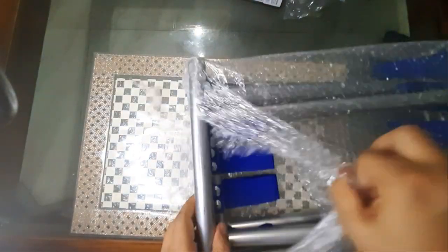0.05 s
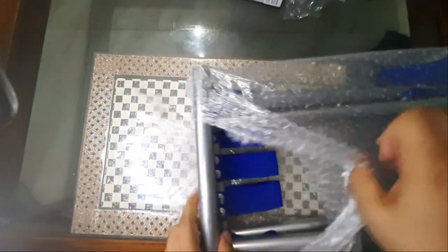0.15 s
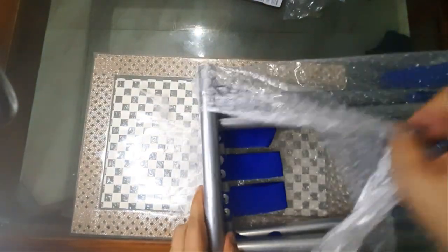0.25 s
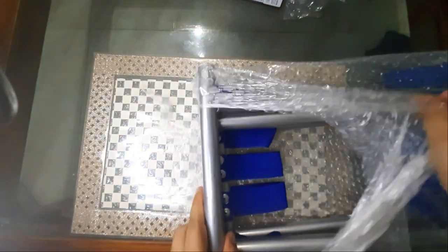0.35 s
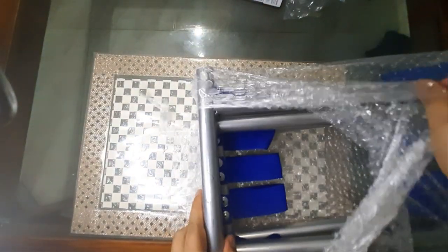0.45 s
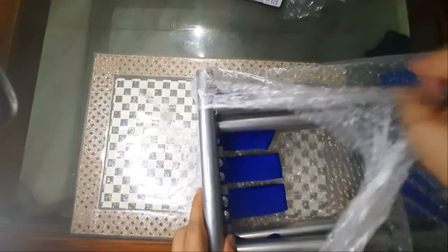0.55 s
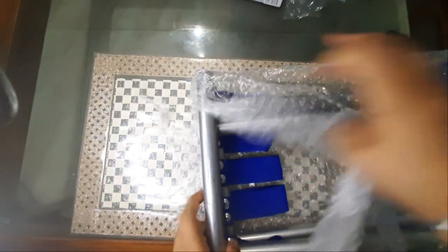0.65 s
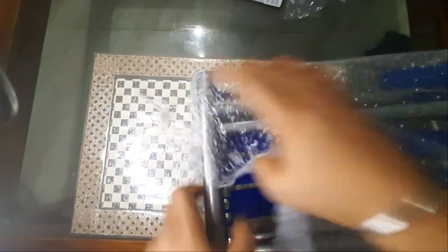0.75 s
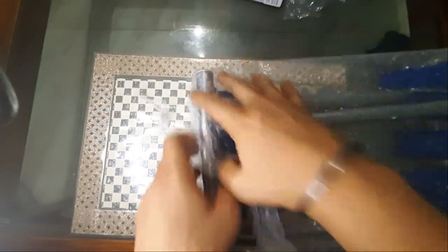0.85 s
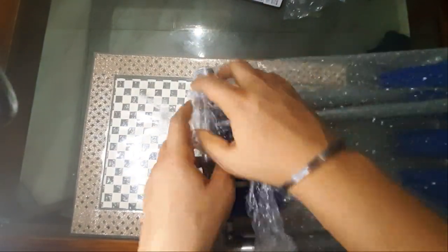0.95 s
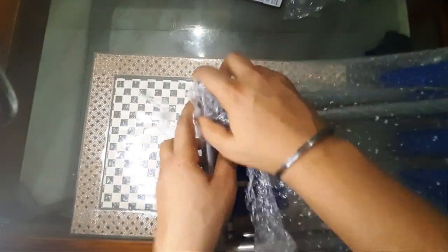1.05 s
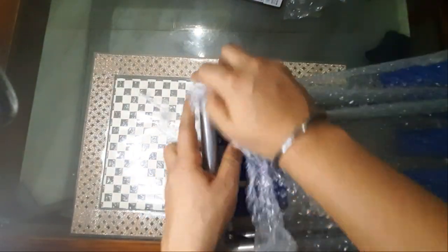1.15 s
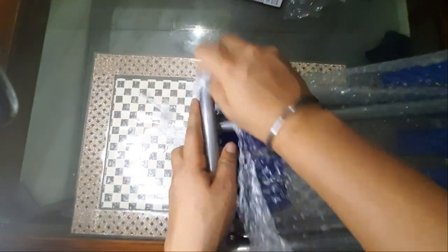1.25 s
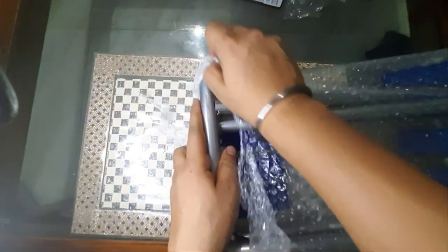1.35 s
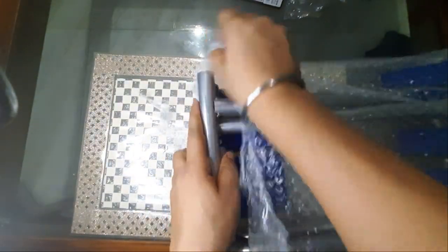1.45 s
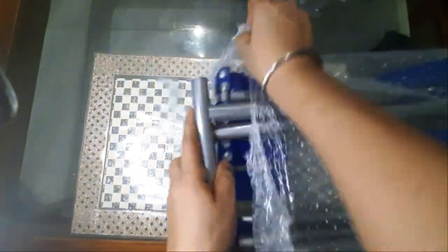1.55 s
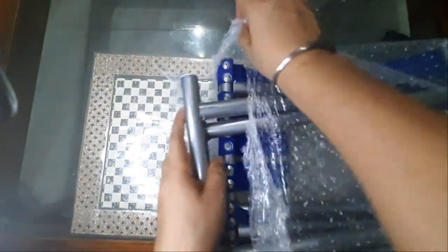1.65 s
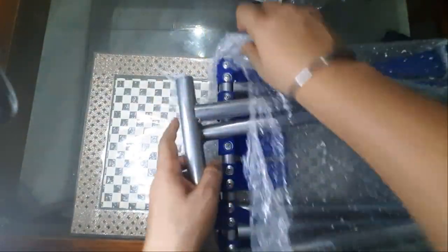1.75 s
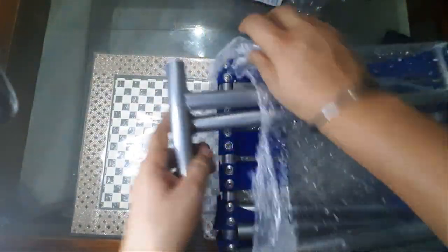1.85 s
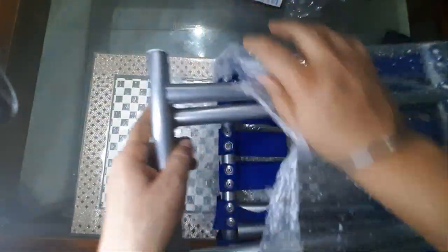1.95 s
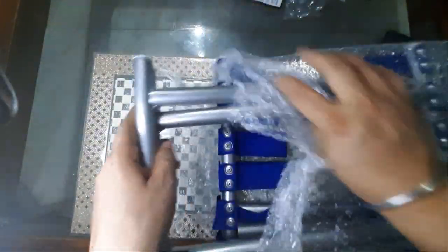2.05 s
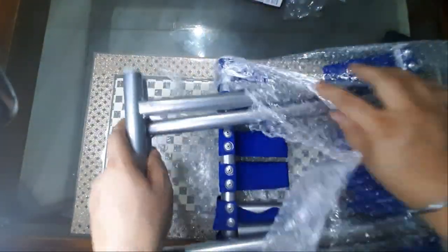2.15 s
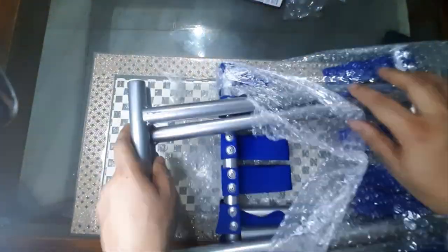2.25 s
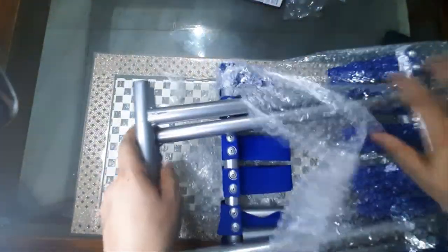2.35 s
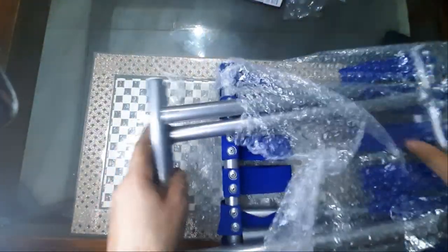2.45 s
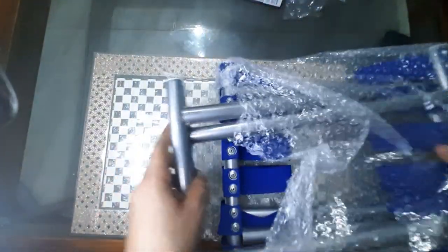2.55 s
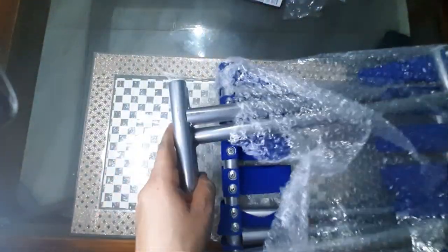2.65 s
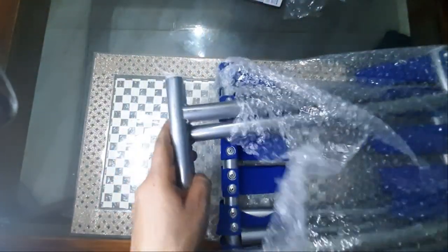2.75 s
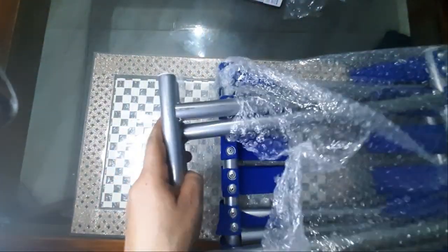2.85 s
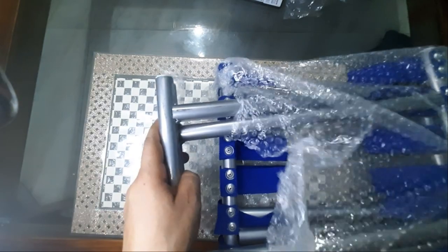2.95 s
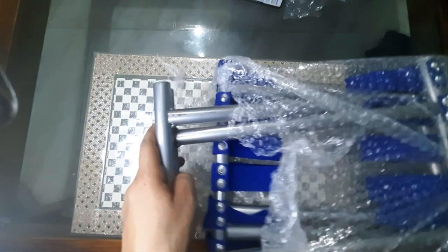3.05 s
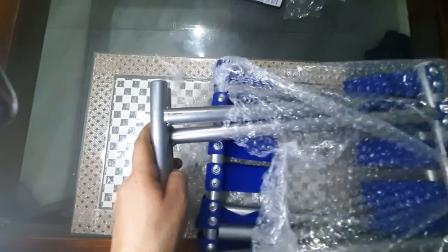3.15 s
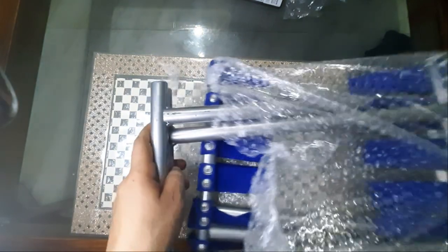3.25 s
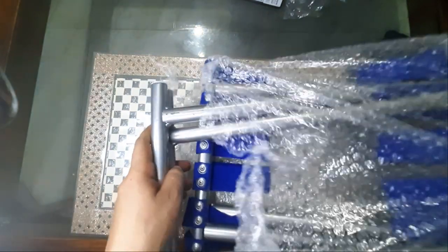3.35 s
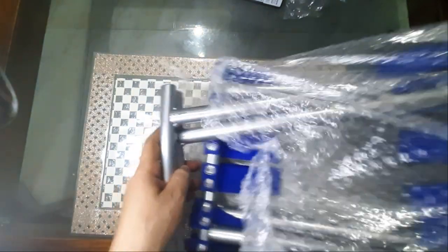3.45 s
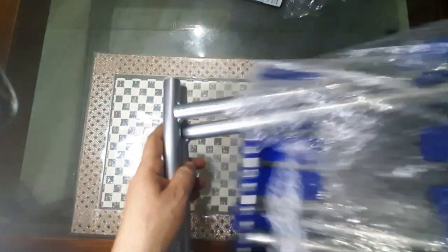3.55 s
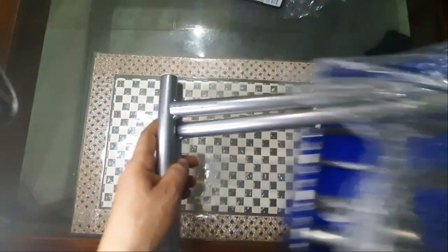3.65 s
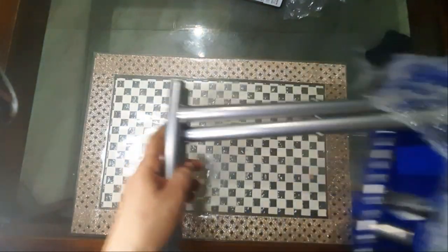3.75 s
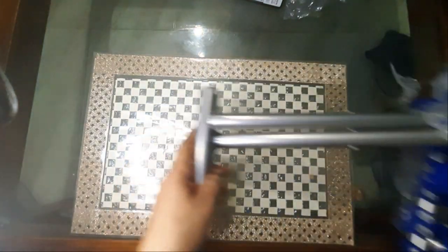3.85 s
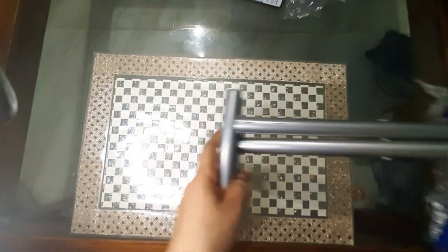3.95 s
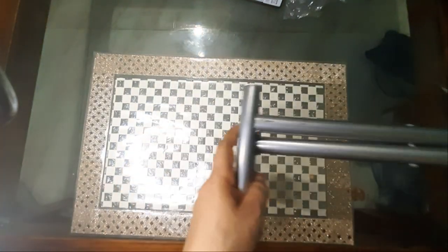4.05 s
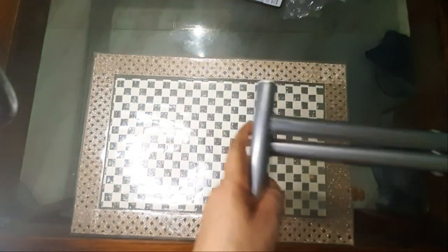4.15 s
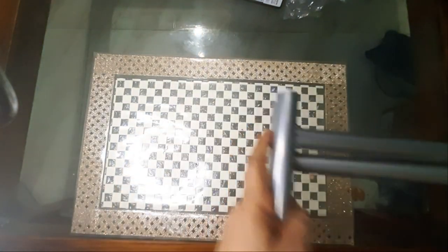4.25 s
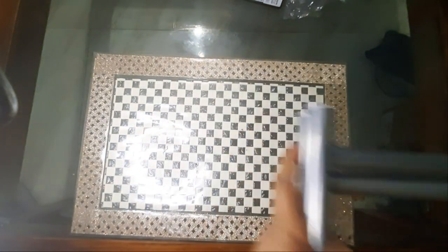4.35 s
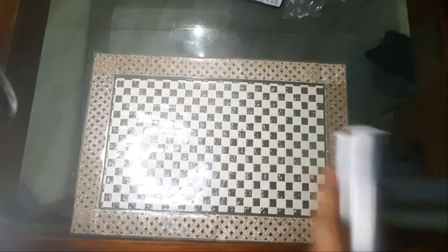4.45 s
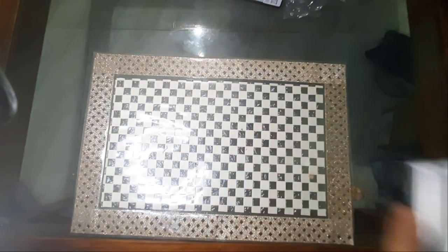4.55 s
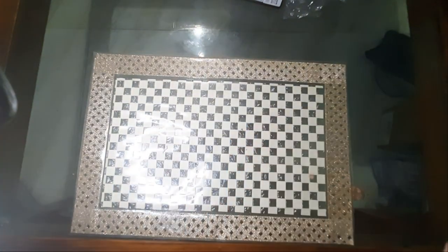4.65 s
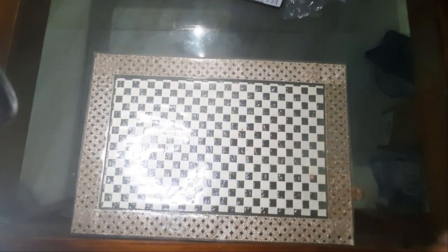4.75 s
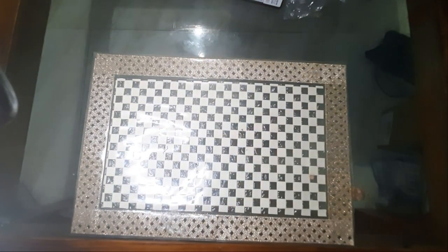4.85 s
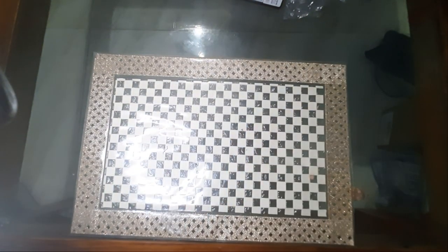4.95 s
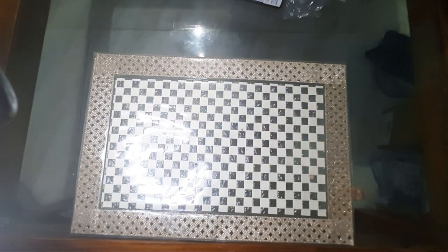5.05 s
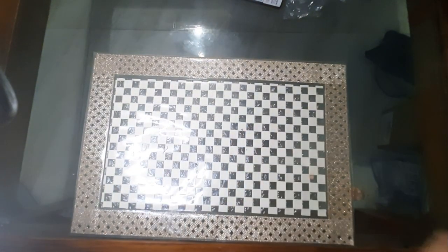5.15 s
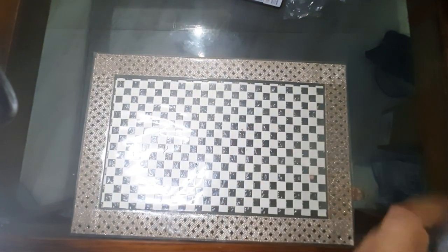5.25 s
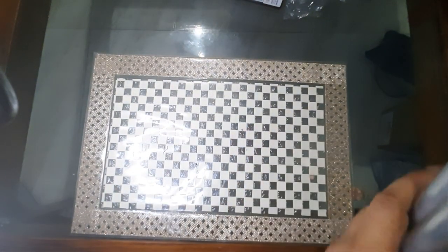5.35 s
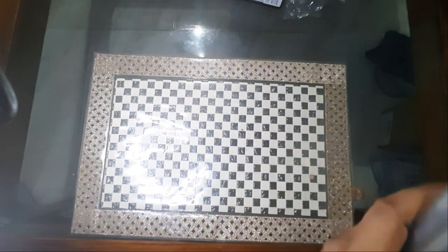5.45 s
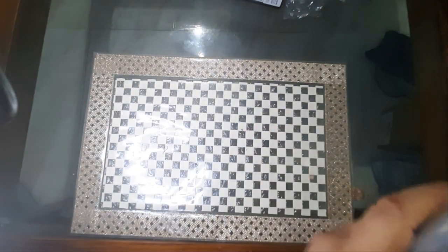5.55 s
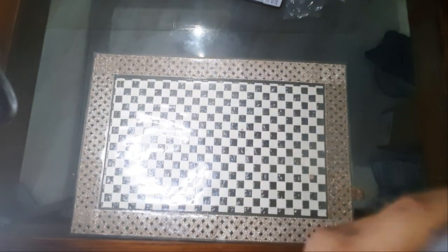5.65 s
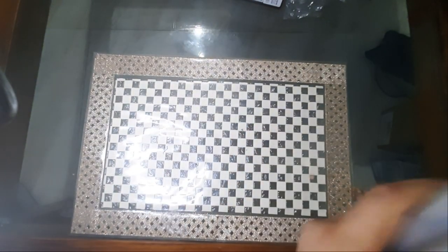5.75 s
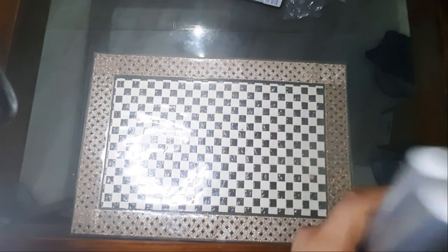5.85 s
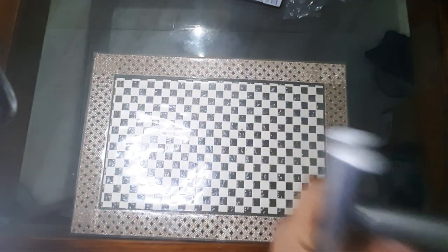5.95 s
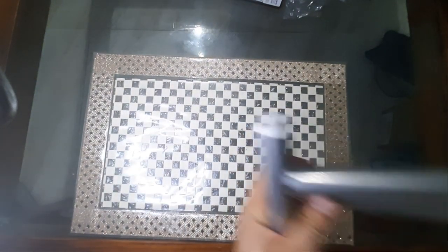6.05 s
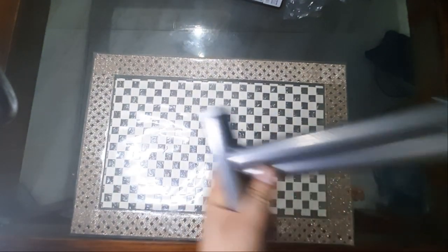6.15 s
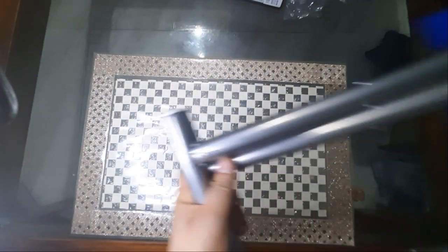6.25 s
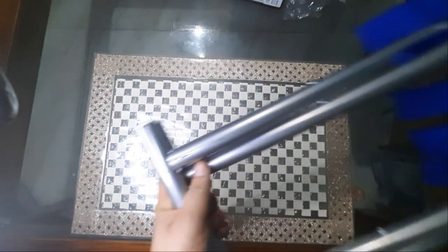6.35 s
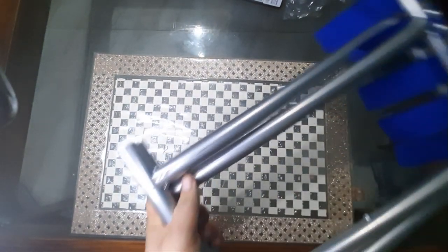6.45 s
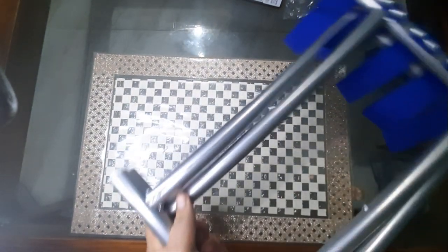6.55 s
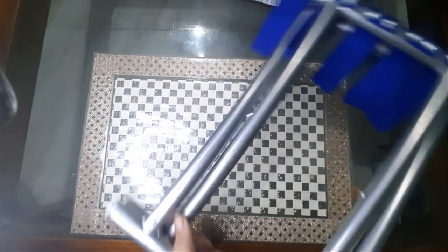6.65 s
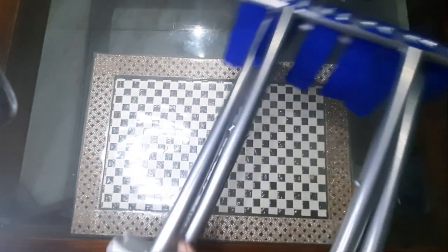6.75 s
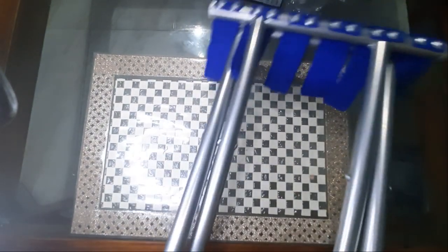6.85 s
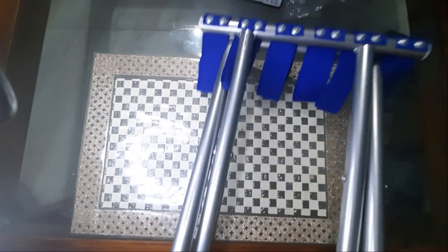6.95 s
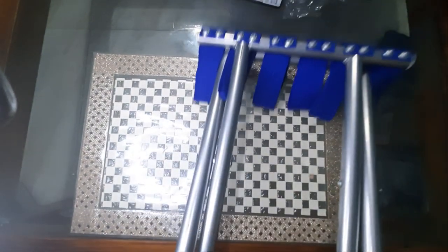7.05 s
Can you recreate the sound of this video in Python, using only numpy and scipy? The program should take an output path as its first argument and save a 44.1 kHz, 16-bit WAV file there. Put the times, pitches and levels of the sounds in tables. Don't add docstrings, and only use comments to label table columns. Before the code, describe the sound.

Close plastic film rustling with sharp pops, hollow metal tube knocks and low table rumble, thinning to sparse crackles and a faint whistle.

```python
import sys
import numpy as np
from scipy import signal
from scipy.fft import rfft, irfft, next_fast_len
from scipy.io import wavfile
from scipy.ndimage import uniform_filter1d

SR = 44100
rng = np.random.default_rng(int(sys.argv[2]) if len(sys.argv) > 2 else 0)


def ratio(d):
    e = np.asarray(d, float) / 20
    return 10 ** e


def digitize_waveform(pressure):
    field = np.atleast_2d(pressure).T
    bounded = np.clip(field, -1, 1)
    quanta = np.round(bounded * 32767).astype(np.int16)
    wavfile.write(sys.argv[1], SR, quanta)


N = 312669


def rms_one(x):
    return x / np.sqrt(np.mean(x ** 2) + 1e-20)


def in_time(rows):
    s, *columns = np.transpose(rows)
    return [np.interp(np.arange(N) / SR, s, column) for column in columns]


def at_hz(points, hz):
    points_hz, points_db = np.transpose(points)
    return np.interp(np.log(hz), np.log(points_hz), points_db)


def drift(rate):
    r = np.exp(-80 * np.pi * rate / SR)
    noise = rng.standard_normal(N // 40 + 2002)
    slow = signal.lfilter([1], [1, -2 * r, r * r], noise)[2000:]
    return np.interp(np.arange(N) / 40, np.arange(len(slow)), rms_one(slow - slow.mean()))


def ring(clicks, hz, t60):
    r = ratio(-60 / (t60 * SR))
    w = 2 * np.pi * hz / SR
    return signal.lfilter([0, np.sin(w)], [1, -2 * r * np.cos(w), r * r], clicks + 1e-18)


def band(x, low_hz, high_hz):
    edges = [low_hz, min(high_hz, .45 * SR)]
    return signal.sosfilt(signal.butter(2, edges, "band", fs=SR, output="sos"), x)


def steep_low(x, hz):
    return signal.sosfilt(signal.ellip(8, .5, 50, .98 * hz, fs=SR, output="sos"), x)


def grains(per_s, uneven_db, clump_db, clump_rate):
    sizes = ratio(uneven_db * np.minimum(rng.exponential(1, N), 5)) * rng.choice([-1, 1], N)
    happens = rng.random(N) < per_s / SR
    return rms_one(sizes * happens * ratio(clump_db * drift(clump_rate)))


def swarm(clicks, spectrum, cycles, patchy_db, count):
    low_hz, high_hz = spectrum[0][0], spectrum[-1][0]
    dealt = rng.integers(0, count, N)
    out = np.zeros(N)
    for k, hz in enumerate(np.geomspace(low_hz, high_hz, count)):
        gain = ratio(at_hz(spectrum, hz) + patchy_db * drift(6.7))
        out += gain * ring(clicks * (dealt == k), hz, cycles / hz)
    return rms_one(band(out, low_hz, high_hz))


def gestures(rows, swing=1.0):
    coarse = np.arange(0, N + 64, 64)
    t, power = coarse / SR, 0
    for s, db, swell, ease in rows:
        before, after = (s - t) / np.clip(swell, .004, 2), (t - s) / np.clip(ease, .004, 2)
        away = np.where(t < s, before, after)
        power = power + ratio(2 * (db - 20 * swing * away))
    return np.interp(np.arange(N), coarse, power)


def chatter(at, strength, length):
    out, t = np.zeros(N + 4000), np.arange(4000) / SR
    for i, gain, t60 in zip(at, strength, np.clip(length, .005, .3)):
        rattle = rng.standard_normal(len(t)) * np.exp(-np.log(1000) * t / t60)
        rattle *= 1.07 / np.sqrt(np.sum(rattle ** 2))
        rattle[0] = 1.2
        out[i:i + len(t)] += gain * rattle
    return out[:N]


# (frequency [Hz], density [dB per Hz])
AIR_SPECTRUM = [(30, -2), (59, 10.5), (1590, -10), (1850, -12), (2900, -24.5), (3980, -9), (8000, -15.5),
                (16000, -52)]
AIR_DB = -60


def air():
    hz = np.maximum(np.fft.rfftfreq(N, 1 / SR), 1)
    shaped = rfft(rng.standard_normal(N)) * ratio(at_hz(AIR_SPECTRUM, hz))
    return ratio(AIR_DB) * rms_one(irfft(shaped, N))


# (time [s], cancelled pitch [Hz])
GLASS_ECHO = [(0, 2730), (.4, 2520), (.6, 2350), (1.05, 1900), (1.9, 1720), (2.3, 2340), (2.45, 2440),
              (3.1, 2700), (3.45, 2360), (4.1, 2450), (4.3, 2750), (4.6, 2870), (5.9, 2500), (6.1, 2700),
              (6.52, 2180), (6.75, 2670), (7.09, 2700)]


def off_glass(x, share):
    samples = np.arange(N)
    lag = SR / (2 * in_time(GLASS_ECHO)[0])
    late = np.interp(samples - lag, samples, uniform_filter1d(x, size=9))
    return x + share * late


SLIPS_PER_S, SLIP_S, SLIP_DEPTH = 100, 0.011, 0.14


def slips(far):
    fits = (rng.random(N) < SLIPS_PER_S / SR) * rng.exponential(SLIP_DEPTH, N) * (1 - far)
    return rms_one(1 + signal.lfilter([1], [1, -np.exp(-1 / (SLIP_S * SR))], fits))


# (frequency [Hz], level [dB])
RUSTLE = [(1900, -16.5), (2500, -11), (3200, -11), (4500, -6), (6300, -2), (8000, -5), (10000, 3),
          (12200, -21)]
CREASE = [(800, -20.5), (1200, -3), (1700, 6), (2400, 7.5), (3200, 10.5)]
FINEST = [(10000, 9.5), (11500, 0.5), (13000, 4.5), (16800, 3.5)]
# (time [s], level [dB])
TOUCH = [(0, -44), (.43, -38), (.5, -57), (.6, -45.5), (1.05, -56.5), (1.13, -43.5), (1.74, -53),
         (2.8, -94), (3.43, -72), (3.96, -56.5), (4.6, -53.5), (5.08, -50), (5.13, -75), (5.68, -46),
         (5.77, -79), (6.1, -75.5), (6.13, -47), (7.09, -54.5)]
# (time [s], distance [m])
DISTANCE = [
    (0, 0.44),
    (1.4, 0.52),
    (2.2, 0.76),
    (4.45, 0.67),
    (4.9, 0.48),
    (5.7, 0.57),
    (6.15, 1.85),
    (6.3, 0.84),
    (6.75, 1.11),
    (7.09, 0.78),
]
# (peak time [s], level [dB], swell [s], ease [s], share of large creases [dB])
PULLS = [(0.02, -34.5, 0.21, 0.2, -3), (0.24, -41, 0.45, 0.49, 0.5), (0.72, -42.5, 0.076, 0.27, -8),
         (0.87, -45.5, 0.33, 0.31, -1), (1.52, -30, 0.14, 0.16, 6), (1.6, -43, 0.089, 0.25, 9.5),
         (1.92, -41.5, 0.46, 0.4, -14), (2.08, -37.5, 0.33, 0.16, -11), (2.335, -40, 0.045, 0.074, -6.5),
         (2.46, -48.5, 0.22, 0.045, -23), (2.63, -44, 0.46, 0.49, -8), (2.9, -42, 0.15, 0.13, -7.5),
         (3.03, -38, 0.16, 0.2, -3.5), (3.28, -43, 0.14, 0.064, -14), (3.6, -31, 0.28, 0.44, -5.5),
         (3.75, -33, 1, 0.14, 3), (3.82, -34.5, 0.086, 0.094, 5.5), (4.25, -41, 0.12, 0.25, -2.5),
         (5.0, -52.5, 0.66, 0.48, 3.5), (5.46, -43.5, 0.22, 0.3, -1.5), (5.6, -42, 0.14, 0.13, 1),
         (6.3, -46, 0.15, 0.53, 6.5), (6.87, -60, 0.067, 1, 4), (7.09, -39, 0.51, .1, 3)]
# (time [s], level [dB], ease [s], share of large creases [dB])
JERKS = [(0.407, -41, 0.067, 7), (1.238, -35, 0.12, -7), (1.338, -49.5, 0.081, 13.5),
         (1.443, -32, 0.08, -0.5), (2.19, -38.5, 0.18, 7), (4.416, -43.5, 0.22, 1), (4.641, -34, 0.28, 1),
         (4.7, -52, 0.51, 12.5), (4.84, -44, 0.15, 4), (5.159, -46.5, 1, -4), (6.121, -38.5, 0.27, -0.5),
         (3.2, -48, 0.25, 0), (3.669, -29, 0.18, -2), (5.484, -40.5, 0.13, 4.5), (5.648, -42.5, 0.1, 8.5),
         (6.209, -43, 0.13, 7.5), (6.231, -40.5, 0.29, 6.5)]
JERK_S = .005
FINEST_DB, FINEST_LOSS_DB_PER_M, FINEST_SWING = -10, 23, 1.46
LARGE_SWING, TOUCH_LARGE_DB = 1.84, -25.5
FAR_M, FAR_TOP_HZ, RUSTLE_TOP_HZ = 1.18, 8150, 11900


def film():
    moves = PULLS + [(s, db, JERK_S, ease, share) for s, db, ease, share in JERKS]
    heavy = [(s, db + share, swell, ease) for s, db, swell, ease, share in moves]
    touch = ratio(2 * in_time(TOUCH)[0])
    metres = in_time(DISTANCE)[0]
    far = np.clip(metres / FAR_M, 0, 1) ** 2

    rustle_gain = np.sqrt(touch + gestures([move[:4] for move in moves]))
    large_gain = np.sqrt(touch * ratio(2 * TOUCH_LARGE_DB) + gestures(heavy, LARGE_SWING))
    nearness = ratio(-47 + FINEST_DB - FINEST_LOSS_DB_PER_M * metres)
    finest_gain = (rustle_gain / ratio(-43)) ** FINEST_SWING * nearness

    rustle = swarm(grains(9000, 2.2, 1.8, 25), RUSTLE, cycles=14.0, patchy_db=2.4, count=14)
    rustle = steep_low(rms_one(off_glass(rustle, share=1.45)), RUSTLE_TOP_HZ)
    dull = signal.sosfiltfilt(signal.butter(4, FAR_TOP_HZ, fs=SR, output="sos"), rustle)
    rustle = (1 - far) * rustle + far * dull
    large = swarm(grains(3000, 0.52, 0.34, 21), CREASE, cycles=16.8, patchy_db=4.0, count=8)
    large = rms_one(off_glass(large, share=0.68))
    finest = swarm(grains(16000, 1.6, 1.5, 45), FINEST, cycles=46.0, patchy_db=3.5, count=5)

    creases = ratio(-0.5) * rustle_gain * rustle
    creases += ratio(-1.5) * large_gain * large
    creases += ratio(10.5) * finest_gain * finest
    return slips(far) * creases


# (frequency [Hz], level [dB], t60 [s])
TUBES = [(411.5, -15, 0.44), (464, -9, 0.2), (557.5, 0.5, 0.13), (714, -1.5, 0.1), (766, -7.5, 0.085),
         (836, -15.5, 0.23), (1080, -14, 0.23), (1187, -11, 0.058), (1237, -11.5, 0.11), (1274, -14, 0.087),
         (1447, -14, 0.11), (1900, -31, 0.012), (2082, -15, 0.063), (2420, -15, 0.066), (2700, -28, 0.057)]
GLASS_TOP = [(68.5, -16.5, 0.26), (109, -7, 0.45), (141, -10, 0.2), (177.2, -2, 0.33), (287, -13.5, 0.22),
             (359.5, -16, 0.18)]
# (frequency [Hz], level [dB])
RUBBING = [(200, -38), (330, -2.5), (520, 8.5), (750, -2), (1200, 10)]
RUMBLE = [(40, -82), (62, 6.5), (110, 2.5), (180, -7.5), (280, 9.5)]
# (peak time [s], level [dB], swell [s], ease [s], weight
# on the glass [dB])
SHOVES = [(0.03, -34.5, 0.29, 0.16, -2), (0.22, -36.5, 0.13, 0.054, -16), (0.3, -40, 0.11, 0.22, -0.5),
          (0.72, -46.5, 0.067, 0.61, -11.5), (0.88, -39, 0.27, 0.066, -3.5), (1.1, -51.5, 0.26, 0.87, 3.5),
          (1.26, -41, 0.2, 0.33, -20), (1.55, -30, 0.12, 0.21, 6.5), (1.9, -42.5, 0.18, 0.27, -19),
          (2.099, -42, 0.32, 0.16, -10.5), (2.26, -41, 0.12, 0.34, -2), (2.48, -52, 0.38, 0.56, -14),
          (2.65, -42, 0.37, 0.19, -1), (3.07, -36, 0.21, 0.14, 0.5), (3.26, -44.5, 0.15, 0.65, 5.5),
          (3.54, -32.5, 0.13, 0.38, -18), (3.68, -38.5, 0.31, 0.22, 4), (3.799, -37, 0.57, 0.019, -10),
          (4.26, -50.5, 0.1, 0.22, 7), (4.67, -44, 0.063, 0.27, 3), (4.92, -50, 0.29, 0.32, -7.5),
          (5.5, -53, 0.11, 0.067, 17), (5.65, -48, 0.093, 0.13, 7), (6.22, -45.5, 0.013, 0.24, -4),
          (5.2, -58.5, 0.094, 0.34, 12),
    (6.27, -43, 0.047, 0.14, 21.5),
    (6.33, -40, 0.12, 0.13, -7),
    (6.623, -60, 0.13, 0.22, 23.5),
    (6.69, -49, 0.075, 0.21, 12),
    (7.09, -53, 0.3, .1, 11),
]
# (time [s], peak [dB], hardness [dB], table share [dB], rattle t60 [s])
KNOCKS = [(0.866, -25, 4.5, 4, 0.048), (1.452, -12.5, 1, -10, 0.08), (1.464, -17, -6, -15, 0.04),
          (1.488, -15, 6.5, 2, 0.042), (1.503, -6.5, 4, -7, 0.05), (0.214, -24, 1.5, -16.5, 0.082),
          (0.268, -21.5, -2, -20.5, 0.04), (0.302, -22.5, -2, -18, 0.05), (0.385, -25, 2, -22, 0.064),
          (1.805, -26.5, -5, -25, 0.12), (1.527, -11, 8.5, 4.5, 0.15), (1.59, -20.5, 6.5, -16, 0.06),
          (1.868, -20, -8, -30, 0.32), (2.03, -20.5, -10, -24, 0.43), (2.187, -14.5, 3, -10, 0.35),
          (2.728, -25.5, -2.5, -21, 0.074), (3.053, -13, 1, -16, 0.055), (3.203, -17, -11, -17.5, 0.26),
          (3.306, -17, -7, -21, 0.0079), (3.528, -17, -3.5, -23.5, 0.056), (3.668, -6, -9, -23, 0.023),
          (3.68, -7, -13, -25, 0.06), (1.555, -22, -6, 8, 0.05), (2.222, -16, 0, -2.5, 0.08),
          (2.472, -26, -22, -22, 0.025), (3.602, -17.5, -3, -18.5, 0.05), (3.626, -14, -2, -20.5, 0.087),
          (3.72, -12.5, -11, -26, 0.034), (3.772, -17, -2, -17, 0.05), (6.228, -31, 10, -15, 0.12),
          (6.254, -33, 6, 4, 0.1), (6.668, -27.5, -2, -10, 0.049), (6.698, -33, -18, -18, 0.1)]
REST_RUB_DB, REST_RUMBLE_DB = -90, -62.5


def frame():
    moves = SHOVES
    heavy = [(s, db + load, swell, ease) for s, db, swell, ease, load in moves]
    rub = np.sqrt(ratio(2 * REST_RUB_DB) + gestures([move[:4] for move in moves]))
    weight = np.sqrt(ratio(2 * REST_RUMBLE_DB) + gestures(heavy))
    s, peak_db, hard_db, table_db, rattle_s = np.transpose(KNOCKS)
    at = np.round(s * SR).astype(int)

    scrape = grains(1500, 2.8, 1.9, 34) * rub * ratio(-33.0)
    out = np.zeros(N)
    for hz, level_db, t60 in TUBES:
        strength = ratio(peak_db - 15 + hard_db * np.log2(hz / 554))
        out += ratio(level_db) * ring(chatter(at, strength, rattle_s) + scrape, hz, t60)
    for hz, level_db, t60 in GLASS_TOP:
        blows = chatter(at, ratio(peak_db - 17 + table_db), 1.3 * rattle_s)
        out += ratio(level_db) * ring(blows, hz, t60)

    damped = swarm(grains(2500, 2.15, 3.24, 29), RUBBING, cycles=8.1, patchy_db=2.5, count=8)
    rumble = swarm(grains(500, 0.65, 0.89, 3.3), RUMBLE, cycles=6.7, patchy_db=-2.0, count=8)
    return out + ratio(1.5) * rub * damped + ratio(-7.5) * weight * rumble


SNAP_LOW_HZ = 1770
BODY_SHARE, BODY_CYCLES, OVERTONE, OVERTONE_SHARE = 0.52, 10, 1.52, 0.53


def give_way(rows, t60, slam):
    out, t = np.zeros(N + 1000), np.arange(900) / SR
    decay = np.exp(-np.log(1000) * t / np.clip(1.57 * t60, .001, .04))
    bursts = 0.43 * rng.standard_normal((len(rows), len(t))) * decay
    if slam:
        bursts[:, 0], bursts[:, 4] = -.7, 2.6
    lows = band(band(bursts, 300, SNAP_LOW_HZ), 199.4, 1.75 * SNAP_LOW_HZ)
    tops = band(band(bursts, 6000, 12000), 6000, 12000)
    for (s, middle_db, low_db, top_db, hz), burst, low, top in zip(rows, bursts, lows, tops):
        middle = band(band(burst, hz / 1.5, hz * 2.15), hz / 1.35, hz * 2.59)
        body = rms_one(ring(middle, hz, BODY_CYCLES / hz))
        overtone = rms_one(ring(middle, OVERTONE * hz, BODY_CYCLES / hz))
        middle = rms_one(middle) + BODY_SHARE * (body + OVERTONE_SHARE * overtone)
        at = round(s * SR) - 2
        peaks_db = (middle_db + low_db, middle_db, middle_db + top_db - 12.0)
        for part, peak_db in zip((low, middle, top), peaks_db):
            out[at:at + len(t)] += ratio(peak_db) * part / np.abs(part).max()
    return off_glass(out[:N], share=0.33)


# (time [s], peak [dB], low part [dB rel], top part [dB rel], body [Hz])
SNAPS = [(0.0709, -19, 5.5, -12, 1200), (0.1876, -30, 3, 18.5, 4400), (0.402, -6, -6, 5, 2620),
         (0.7188, -23, -18, -1, 4140), (0.7848, -23.5, 0, 1, 4230), (1.2373, -10.5, -9, 8, 3050),
         (1.3366, -7, -12.5, -21, 5870), (1.4402, -3.5, -15.5, 1, 3220), (1.509, -18, -4, 0, 4630),
         (1.5415, -9.5, -4, -8, 2550), (3.7207, -17, -15, -1, 3900), (6.2292, -27.5, 0, -2, 2420),
         (3.0537, -26.5, 5, -26, 2550), (3.3068, -37.5, -3.5, -8.5, 4037), (3.5691, -7.5, -10, 0, 4200),
         (3.5895, -12.5, -7.5, 4, 2900), (3.669, -19.5, -1, -4, 3200), (3.755, -8, -12, -8.5, 5000),
         (3.8057, -0.5, -9.5, -3, 2860), (4.258, -28.5, -5, -2, 5660), (4.4162, -23, -4, -20, 2580),
         (4.641, -11, -15, 13, 3100), (4.6967, -12.5, -16, -6, 3020), (5.4832, -18, -6, 4, 1500),
         (5.644, -26, -16, 12, 2830), (5.646, -19, -9, 9, 2780), (6.2083, -28, -2, -4, 1980)]


def snaps():
    return give_way(SNAPS, t60=0.0048, slam=True)


# (time [s], peak [dB], body [Hz], top part [dB rel])
TICKS = [(0.16, -33, 6250, -14), (0.7802, -24, 4800, -6), (1.0186, -30, 6500, -16),
         (1.1864, -22, 5500, -17), (1.252, -32, 4600, 4), (1.415, -23, 5600, -13),
         (2.012, -19.5, 3450, -20), (2.282, -31, 3940, -12), (2.327, -27, 4100, -20),
         (2.45, -23.5, 5100, -34), (2.5584, -33, 5900, -14), (3.995, -53, 6560, -57),
         (4.5649, -36, 6200, -12), (4.707, -20, 4730, -18), (4.778, -30, 4930, 3), (4.836, -29, 5900, 14),
         (5.0011, -26, 4630, 9), (5.0717, -38.5, 5330, 13.5), (5.156, -20.5, 5640, -25),
         (5.2428, -40, 5300, -9), (5.286, -34, 4440, -3.5), (5.931, -43, 5030, -18),
         (6.1167, -23.5, 2880, -20), (7.0504, -34, 4000, 14)]
TICK_LOW_DB, TICK_T60_S = -49, 0.011


def ticks():
    rows = [(s, db, TICK_LOW_DB, top_db, hz) for s, db, hz, top_db in TICKS]
    return give_way(rows, TICK_T60_S, slam=True)


# (time [s], peak [dB], body [Hz])
CRACKLES = [(0.2583, -25, 6090), (0.535, -26, 7750), (0.7023, -23, 3900), (0.7557, -36, 3970),
            (1.1054, -23, 5700), (1.765, -27, 2790), (1.929, -21, 2810), (2.3116, -36, 3870),
            (2.99, -25, 5060), (3.0854, -23, 2540), (3.1976, -23, 3995), (3.46, -32, 6350),
            (3.9385, -44, 5440), (4.0831, -35, 6000), (4.1669, -41, 7820), (4.2188, -33, 7120),
            (4.2385, -23, 7160), (4.3665, -35, 5380), (4.3933, -41, 4030), (4.591, -34, 6040),
            (4.6064, -35, 6030), (4.812, -23.5, 2840), (4.917, -40, 3040), (4.966, -28, 3020),
            (5.03, -32, 2780), (5.046, -27, 3600), (5.3575, -26, 5580), (5.4226, -32, 6730),
            (5.6126, -20.5, 2850), (5.9244, -37, 3820), (5.9399, -36, 5150), (5.9758, -38, 4000),
            (6.121, -42, 6000), (6.128, -43, 5370), (6.168, -21, 3210), (6.8473, -32, 4690),
            (6.9294, -35, 3460), (6.973, -42, 4070)]
CRACKLE_TOP_DB, CRACKLE_LOSS_DB = -31, 10


def crackles():
    rows = [(s, db - CRACKLE_LOSS_DB, TICK_LOW_DB, CRACKLE_TOP_DB, hz) for s, db, hz in CRACKLES]
    return give_way(rows, TICK_T60_S, slam=False)


# (time [s], peak [dB])
PIN = [
    (1.494, -21),
    (1.502, -14),
    (1.509, -32),
    (1.535, -25),
    (1.5875, -22),
]
PIN_HZ, PIN_T60_S, PIN_RATTLE_S = 10000, 0.0057, 0.032


def pin():
    s, peak_db = np.transpose(PIN)
    at = np.round(s * SR).astype(int)
    rattles = chatter(at, ratio(peak_db), np.full(len(s), PIN_RATTLE_S))
    return band(ring(rattles, PIN_HZ, PIN_T60_S), 8500, 12000)


# (time [s], peak [dB], low part [dB rel], top part [dB rel], body [Hz])
CRUNCHES = [
    (1.502, -13.5, -17, -7, 4200),
    (1.523, -13, 2, -33, 6000),
    (1.535, -10.5, 4, -26, 3150),
    (1.587, -20, 5.5, 0, 4900),
    (1.597, -22.5, -6, -10, 4600),
    (6.9, -33.5, -8, -3, 2600),
    (5.3, -30, 0, 8, 2000),
    (2.188, -21, -2, 9, 4000),
    (5.156, -29, -30, -19, 4640),
]


def crunches():
    return give_way(CRUNCHES, t60=0.034, slam=False)


# (time [s], peak [dB])
TAP = (4.415, -14)
# (frequency [Hz], level [dB], t60 [s])
ROD = [(286, -24, 0.06), (515, -3.5, 0.045), (620, -3.5, 0.028), (870, -19, 0.018), (1500, -11, 0.054),
       (1720, -5, 0.026), (1920, 1.5, 0.025), (2104, -1, 0.035), (2350, -11, 0.093)]


def rod():
    at, gain = [round(TAP[0] * SR)], [ratio(TAP[1] - 13.0)]
    return sum(ratio(level_db) * ring(chatter(at, gain, [.12]), hz, t60) for hz, level_db, t60 in ROD)


# (time [s], level [dB])
SLIDE = [
    (6.58, -67),
    (6.62, -59),
    (6.7, -62),
    (6.8, -71),
    (6.9, -64),
    (6.97, -49),
    (7.09, -59),
]
SLIDE_HZ, SLIDE_T60_S, SLIDE_START_S = 1715, 0.031, 6.56


def slide():
    noise = rng.standard_normal(N)
    for _ in range(2):
        noise = ring(noise, SLIDE_HZ, SLIDE_T60_S)
    noise = noise / np.sqrt(uniform_filter1d(rms_one(noise) ** 2, size=600) + .1)
    sliding = np.arange(N) > SLIDE_START_S * SR
    return ratio(in_time(SLIDE)[0]) * rms_one(noise) * sliding


ROOM_T60_S, WALL_CUT_HZ = 0.3, 6700


def room(x):
    size = next_fast_len(N + SR)
    w = 2 * np.pi * np.fft.rfftfreq(size, 1 / SR)
    walls = 1 / (1 + 1j * w / (2 * np.pi * WALL_CUT_HZ))
    echoes = 0
    for k, lag in enumerate(rng.uniform(.006, .035, 10)):
        loop = ratio(-60 * lag / ROOM_T60_S) * walls * np.exp(-1j * w * lag)
        echoes = echoes + loop / (1 - loop) * (-1) ** k
    return irfft(rfft(x, size) * echoes, size)[:N]


ROOM_DB, STEADY_TOP_HZ = -21, 15900


def scene():
    near = film() + frame() + pin() + rod() + slide()
    sharp = snaps() + ticks() + crunches()
    steady = near + ratio(ROOM_DB) * room(sharp + ratio(-6) * near) + air()
    return (sharp + crackles() + steep_low(steady, STEADY_TOP_HZ))[None]


def top_cut(x):
    return signal.sosfilt(signal.butter(12, 16860, fs=SR, output="sos"), x)


def record(dry):
    heard = signal.sosfilt(signal.butter(4, 45, "high", fs=SR, output="sos"), dry)
    return top_cut(np.clip(heard, -.95, .95))


dry = scene()
out = record(dry)
digitize_waveform(out)
```